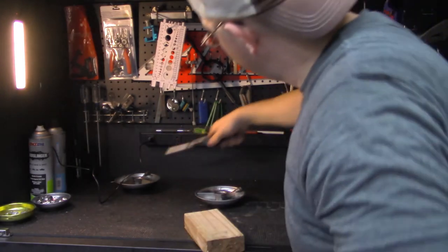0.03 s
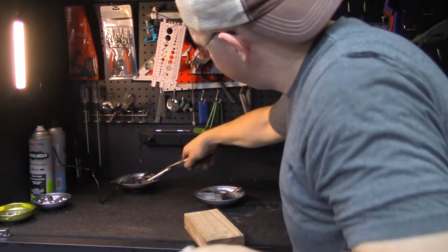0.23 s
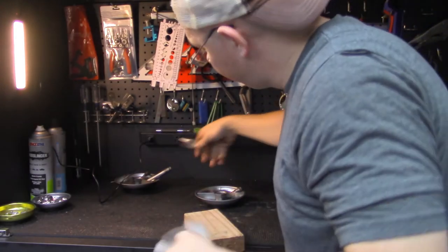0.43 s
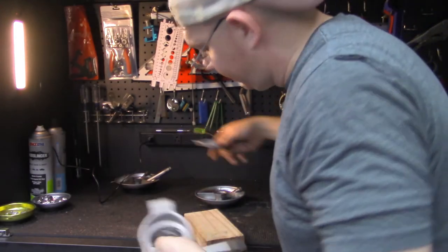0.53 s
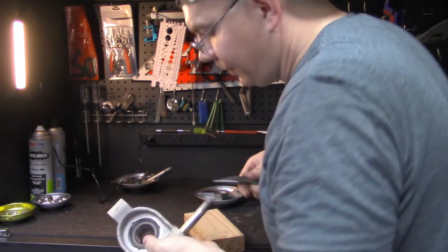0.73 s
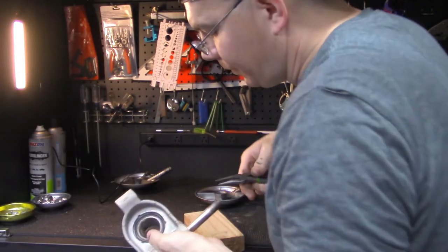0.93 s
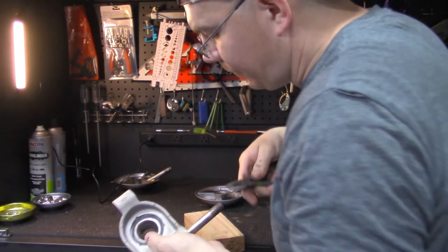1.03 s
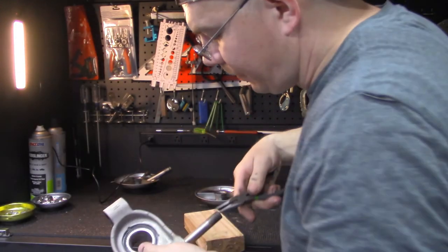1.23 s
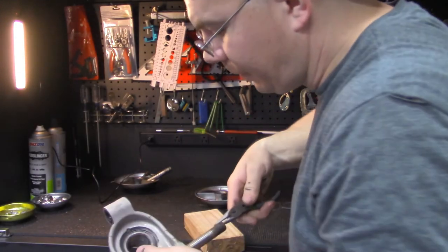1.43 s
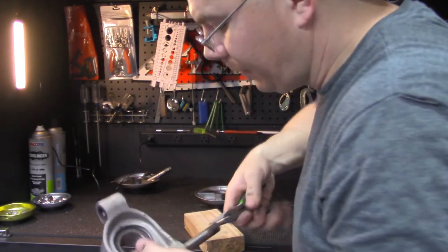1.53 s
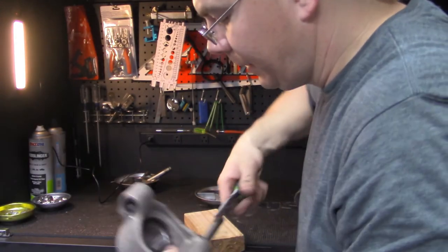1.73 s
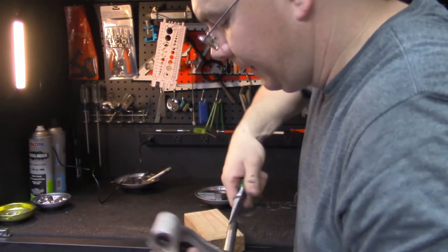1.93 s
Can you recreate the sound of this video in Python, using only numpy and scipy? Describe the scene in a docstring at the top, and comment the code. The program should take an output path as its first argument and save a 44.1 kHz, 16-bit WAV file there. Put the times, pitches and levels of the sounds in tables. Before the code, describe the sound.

A steel tool is dropped into a metal parts dish at about 0.23 seconds: a loud bright clank, rapid rattling and hollow bench knock until 0.35, ringing briefly. A sharp settling tick comes at 0.52, a soft low bump near 0.78. Pliers click and scrape on metal from 1.33 to 1.58, slip softly at 1.65, then faint hand rubbing. Small room, close microphone, quiet air and low rumble.

```python
"""A steel tool drops into a parts dish on a workbench: blows excite clear and crowded modes of tool and dish,
the dish rattles, drumming on the bench top, and the tool settles with a tick. A dull bump follows, then pliers
click and scrape on a metal part, the jaws slip softly, and the part rubs in the hand as it is turned over.
A small workshop reverberates the tool and part, over faint air noise and a low rumble, both shaped noise."""
import sys
import numpy as np
from scipy import signal
from scipy.fft import rfft, irfft
from scipy.io import wavfile
from scipy.ndimage import uniform_filter1d

SR = 44100
rng = np.random.default_rng(int(sys.argv[2]) if len(sys.argv) > 2 else 0)


def transcribe(u):
    """Save the signal u as a 16-bit wav file named by the first command-line argument.

    u: samples, shape (n,) or (channels, n), limited to [-1, 1]; the rate is SR.
    q: integer samples, one column per channel.
    """
    v = np.clip(np.atleast_2d(u).T, -1, 1)
    q = np.round(v * 32767).astype(np.int16)
    wavfile.write(sys.argv[1], SR, q)


N = 88200
T = np.arange(N) / SR  # time in seconds
HZ = np.maximum(np.fft.rfftfreq(N, 1 / SR), 1)  # frequency of each spectral bin, kept above zero for the logarithm
LEFT_RIGHT = np.array([[1], [-1]])  # opposite signs for the two channels

# Spectrum of the air noise. Each row: frequency in Hz, relative level in dB.
AIR_SPECTRUM = [(15, -37), (25, -2), (96, -10), (215, -22), (289, -21.5), (552, -23.5), (631, -20.5),
                (848, -26.5), (1020, -29), (1170, -28), (2630, -37), (4500, -36.5), (15500, -47)]
AIR_DB = -43
# Spectrum of the low rumble. Each row: frequency in Hz, relative level in dB per Hz.
RUMBLE_SPECTRUM = [(20, -14.5), (40, 1), (65, -4.5), (100, -9.5), (150, -21.5), (280, -36.5), (500, -44.5),
                   (2000, -73)]
# Course of the rumble. Each row: time in seconds, level in dB.
RUMBLE_LEVEL = [(0, -70), (.2, -42), (.3, -34), (.45, -45.5), (.72, -46.5), (.81, -31.5), (.92, -37),
                (1.05, -39), (1.3, -51.5), (2, -69.5)]

# Reverberation time of the workshop. Each row: frequency in Hz, decay by 60 dB in seconds.
ROOM_DECAY = [(200, 0.61), (1000, 0.3), (4000, 0.36), (7000, 0.32), (12000, 0.14)]
ROOM_BUILD_S = 0.0016
# How the microphone pair hears diffuse sound.
# Each row: frequency in Hz, left minus right in dB, phase lead of the left in rad, coherence from 0 to 1.
DIFFUSE_STEREO = [(40, 2.5, 1.1, 0.99), (122, 6, 0.65, 1), (318, 4, 1.4, 0.65), (900, 9.5, 1.67, 0.12),
                  (2500, 6, -1, 0.32), (6100, 2.5, -1.1, 0.36), (8800, 3, -1.5, 0.7),
                  (13700, 0.5, -3, 0.66)]
# How the microphone pair hears direct sound.
# Each row: frequency in Hz, left minus right in dB, phase lead of the left in rad.
DIRECT_STEREO = [(200, 5, .3), (900, 8, -.2), (2500, 5, -.4), (6000, 3, -.35), (8000, 2, -.7),
                 (9500, 1, -1.8), (13000, 0, -2.8)]
TOP_HZ = 16000  # upper limit of the recorder

# Rubs of the part in the hand.
# Each row: centre in seconds, half length in seconds, level in dB, resonance in Hz, its width in Hz.
RUBS = [(1.818,0.19,-58,1487,507), (1.954,0.091,-57.5,850,247)]
RUB_GRAIN_DB = 4

# A soft bump as the part is brought up to the bench.
BUMP_S, BUMP_DB, BUMP_T60_S, BUMP_HZ = 0.775, -43.5, 0.19, 290

# Light metal contacts; the grip and the spot touched set three short resonances. Each row: start in seconds,
# relative level in dB, extra level of the low resonance in dB, low, middle and high resonance in Hz.
TICKS = [(0.5208,3,-2.5,3150,4800,6680), (1.3274,-8.5,7,2530,5300,6950), (1.3367,-8.5,7,2750,5000,7000),
         (1.36,-2,-1,2430,4670,6950), (1.377,-13,16,2860,5360,6750), (1.3863,-4,4,2120,4500,5600),
         (1.4695,-0.5,-11,2330,4170,6040), (1.4947,-12.5,0,2280,4150,5700), (1.5807,-9.5,-8,2360,4220,6200)]
# Colour of a light contact. Each row: frequency in Hz, level in dB per Hz.
TICK_SPECTRUM = [(200, -36), (950, -10.5), (1450, -16.5), (2000, -6.5), (3200, -7), (4200, -6), (5800, -4),
                 (7200, -2.5), (8300, -13.5), (9500, -14.5), (11000, -17.5), (16000, -55)]
TICK_DB, TICK_PEAK_DB, TICK_PEAK_WIDTH_HZ = -3.5, 9, 530
TICK_GRIT_DB, TICK_GRIT_T60_S = -6, 0.0058
CONTACT_RING_DB, CONTACT_RING_T60_S, CONTACT_ROOM_DB = -1.5, 0.071, -4.5
# Colour of the jaws sliding over the part. Each row: frequency in Hz, level in dB.
SCRAPE_SPECTRUM = [(300, -13), (700, -4.5), (950, 8), (1400, -7.5), (2100, 0), (2800, 11), (3600, -5),
                   (7000, -7), (8500, -34), (15000, -34)]
SCRAPE_S, SCRAPE_LENGTH_S, SCRAPE_PER_S, SCRAPE_DB = 1.335, 0.062, 900, -25.5
# Colour of the jaws slipping off the part. Each row: frequency in Hz, relative level in dB.
SLIP_SPECTRUM = [(1000,-22), (4500,-3.5), (16000,-15)]
SLIP_S, SLIP_WIDTH_S, SLIP_DB = 1.65, 0.033, -50.5

# Blows of the tool on the dish. Each row: start in seconds, then relative levels in dB
# of the clash, the ring of the tool, the ring of the dish and the thud of the bench.
KNOCKS = [(0.2306,3,-1.5,-6,-7), (0.2334,-3.5,-6,-7,-6), (0.2461,-9,-16.5,-0.5,6.5), (.285,-8,-21,1.5,-2),
          (0.3275,-4,-1.5,-3,4.5), (0.334,-9.5,-7.5,-10.5,-4)]
STRIKE_SCATTER_DB = 3  # every blow lands on another spot and favours other modes
SETTLE_RING_DB = -23  # the settling tick stirs the tool's ring again
# Crowded high modes of the dish. Each row: frequency in Hz, relative level in dB per Hz.
CLASH_SPECTRUM = [(200, -31.5), (600, -22.5), (1150, -4), (1750, -17), (2220, 0), (2700, -12), (3900, -3),
                  (5200, -3.5), (6000, 3), (7400, -1.5), (8100, -7), (9400, -8.5), (10400, -9),
                  (11800, -27.5), (16000, -39)]
CLASH_DB, CLASH_T60_S, CLASH_ROOM_DB, CLASH_SIDE_DB = -9.5, 0.045, -4.5, -10.5
# The lighter contacts of the rattle have a flatter colour.
# Each row: frequency in Hz, relative level in dB per Hz.
RATTLE_SPECTRUM = [(300,-15), (1300,-1), (7400,-0.5), (10000,-8.5), (12000,-47)]
# The dish rocks on the bench between the blows; its contacts fade in dB per second.
RATTLE_S, RATTLE_LENGTH_S, RATTLE_PER_S, RATTLE_FADE_DB_S = 0.247, 0.08, 260, 28
RATTLE_STEEL_DB = -13.5
# Clear modes of the tool. Each row: frequency in Hz, level in dB, decay by 60 dB in seconds.
TOOL_MODES = [(2201.5,-18,0.083), (3856,-26.5,0.11), (4929,-31,0.72), (5013,-21.5,0.12), (6158,-22,0.079),
              (8795,-24.5,0.13)]
# Clear modes of the dish. Each row: frequency in Hz, level in dB, decay by 60 dB in seconds.
DISH_MODES = [(242,-38,0.43), (689,-43.5,0.52), (1327,-31.5,.22), (1622,-38,0.41), (3284,-28,0.21),
              (7490,-28,0.27)]
TWIN_SPLIT, TWIN_DB = 0.0072, -15  # mean share by which a mode's weaker twin lies higher, and its level
MODE_SPREAD_RAD, RING_ROOM_DB = 0.45, -10  # each mode radiates its own way, so the two ears differ
# Resonances of dish and bench top together. Each row: frequency in Hz, width in Hz, relative level in dB.
BENCH_MODES = [(175.7, 44, -5), (242.5, 21, -1.5), (327, 120, -6), (435, 31, -23.5), (613, 46, 4.5),
               (680, 90, 4), (860, 120, -2.5), (1160, 91, 0), (1332, 96, 6), (1524, 68, 1)]
BENCH_DB, BENCH_T60_S, BENCH_ROOM_DB, BENCH_PAN_DB = -32.5, 0.073, -1, 19  # pan: left minus right


def amp(db):
    """Decibel law: level to amplitude ratio."""
    return 10 ** (np.asarray(db) / 20)


def over_hz(table, axis=1):
    """Logarithmic frequency scale: one column of a table, interpolated along it."""
    table = np.array(table, float)
    return np.interp(np.log(HZ), np.log(table[:, 0]), table[:, axis])


def fade(t60):
    """Exponential decay: damping lowers the amplitude by 60 dB in t60 seconds."""
    return np.exp(-np.log(1000) * T / max(t60, 1e-3))


def resonance(hz, width):
    """Resonance: the gain peaks at 1 and falls off on either side."""
    return 1 / (1 + (2 * (HZ - hz) / width) ** 2)


def noise(gain):
    """Spectral shaping: random noise of rms 1 coloured by a gain."""
    x = irfft(rfft(rng.standard_normal(N)) * gain, N)
    return x / x.std()


def unit(x):
    """Energy normalisation: a response scaled to unit energy, averaged over its channels."""
    return x / np.sqrt(np.mean(np.sum(x ** 2, axis=-1)))


def excite(push, response):
    """Superposition: convolution lets every push start the response anew."""
    return signal.fftconvolve(np.atleast_2d(push), np.atleast_2d(response), axes=-1)[:, :N]


def pushes(times, dbs):
    """Impulsive excitation: one impulse for each contact."""
    return np.bincount((np.asarray(times) * SR).astype(int), amp(dbs), N)[:N]


def chatter(start, length, rate, fade_db, scatter_db):
    """Repeated impact: uneven contacts that weaken by fade_db per second."""
    chance = rng.standard_normal((200, 2))
    after = np.abs(np.arange(len(chance)) + 0.35 * chance[:, 0]) / rate
    levels = scatter_db * chance[:, 1] - fade_db * after
    keep = after < length
    return pushes(start + after[keep], levels[keep])


def click(gain):
    """Minimum phase: the most compact causal pulse with the given spectrum, by folding the cepstrum."""
    cepstrum = irfft(np.log(gain), N)
    cepstrum[1:N // 2] *= 2
    cepstrum[N // 2 + 1:] = 0
    return irfft(np.exp(rfft(cepstrum)), N)


def envelope(push, t60):
    """Energy addition: the height of a ring that every push feeds afresh."""
    return np.sqrt(np.abs(excite(push ** 2, fade(t60) ** 2)))


def crowded(push, t60, gain):
    """High modal density: modes too close to tell apart act as fading noise, coloured by the struck body."""
    return excite(envelope(push, t60) * noise(1), unit(click(gain)))


def diffuse(gain):
    """Diffuse field: partly coherent stereo noise of rms 1, as if from all sides."""
    left, other = rfft(rng.standard_normal((2, N)))
    balance = amp(over_hz(DIFFUSE_STEREO) / 2)
    coherence = np.clip(over_hz(DIFFUSE_STEREO, axis=3), 0, 1)
    right = coherence * left + np.sqrt(1 - coherence ** 2) * other
    right = right * np.exp(-1j * over_hz(DIFFUSE_STEREO, axis=2))
    x = irfft(np.array([left * balance, right / balance]) * gain, N)
    return x / x.std()


def place(x):
    """Direct field: level and phase differences between the microphones, mostly louder on the left."""
    balance = amp(over_hz(DIRECT_STEREO) / 2)
    lag = np.exp(-1j * over_hz(DIRECT_STEREO, axis=2))
    return irfft(rfft(x) * np.array([balance, lag / balance]), N)


def background():
    """Stationary and swelling noise: faint air, and a low rumble that swells as things are moved about."""
    air = amp(AIR_DB) * diffuse(amp(over_hz(AIR_SPECTRUM)))
    rumble_gain = amp(np.interp(T, *np.array(RUMBLE_LEVEL).T))
    return air + rumble_gain * diffuse(amp(over_hz(RUMBLE_SPECTRUM)))


def workshop():
    """Reverberation: dense reflections build up quickly and decay at a rate that depends on frequency."""
    field = rfft(diffuse(1))
    centres = [hz for hz, _ in ROOM_DECAY]
    tail = 0
    for hz, t60 in ROOM_DECAY:
        band = over_hz([(c, c == hz) for c in centres])  # a triangle that overlaps its neighbours
        tail = tail + irfft(field * band, N) * fade(t60)
    return unit(tail * (1 - np.exp(-(T / ROOM_BUILD_S) ** 2)))


def bump():
    """Soft impact: a padded contact excites nothing above the low mids."""
    dull = 1 / (1 + (HZ / BUMP_HZ) ** 8)
    return amp(BUMP_DB) * place(crowded(pushes([BUMP_S], [0]), BUMP_T60_S, dull))


def handling(room):
    """Sliding friction: soft, grainy resonant rubs swell and die away as the part is turned over."""
    rubs = 0
    for s, half, db, hz, width in RUBS:
        grain = amp(RUB_GRAIN_DB * noise(resonance(0, 120)))  # slow random flutter of the level
        swell = np.exp(-((T - s) / half) ** 2)
        rubs = rubs + amp(db) * swell * grain / grain.mean() * noise(resonance(hz, width))
    return place(rubs) + amp(CONTACT_ROOM_DB) * excite(rubs, room)


def tick(s, db, low_db, *pitches):
    """Hard contact: a sharp pulse through three short resonances, with a random crunch of surface grit."""
    peaks = 0
    for hz, extra in zip(pitches, (low_db, 0, 0)):
        peaks = peaks + amp(TICK_PEAK_DB + extra) * resonance(hz, TICK_PEAK_WIDTH_HZ)
    colour = amp(over_hz(TICK_SPECTRUM)) * (1 + peaks)
    pulse = excite(pushes([s], [db + TICK_DB]), click(colour))
    grit = unit(noise(1) * fade(TICK_GRIT_T60_S))
    return pulse + amp(TICK_GRIT_DB) * excite(pulse, grit)


def scrape():
    """Sliding contact: the jaws give a dense run of small, uneven pulses."""
    grit = chatter(SCRAPE_S, SCRAPE_LENGTH_S, SCRAPE_PER_S, fade_db=7, scatter_db=5)
    return amp(SCRAPE_DB) * excite(grit, click(amp(over_hz(SCRAPE_SPECTRUM))))


def slip():
    """Friction noise: the jaws leave the part in one soft swell."""
    swell = np.exp(-((T - SLIP_S) / SLIP_WIDTH_S) ** 2)
    return amp(SLIP_DB) * swell * noise(amp(over_hz(SLIP_SPECTRUM)))


def light_contacts(room):
    """Damped vibration: ticks, scrape and slip share a brief noisy ring."""
    direct = scrape() + slip() + sum(tick(*row) for row in TICKS)
    ring = amp(CONTACT_RING_DB) * excite(direct, unit(noise(1) * fade(CONTACT_RING_T60_S)))
    return place(direct + ring) + amp(CONTACT_ROOM_DB) * excite(direct, room)


def steel(modes, times, dbs):
    """Modal vibration: every blow feeds the clear modes unevenly, and each beats faintly with its twin."""
    ring = 0
    for hz, db, t60 in modes:
        phase, twin_phase, split = rng.random(3)  # phases in cycles
        ears = MODE_SPREAD_RAD * rng.standard_normal() * LEFT_RIGHT
        push = pushes(times, dbs + STRIKE_SCATTER_DB * rng.standard_normal(len(times)))
        twin_hz = hz * (1 + TWIN_SPLIT * (0.5 + split))
        main = np.sin(2 * np.pi * (hz * T + phase) + ears)
        twin = np.sin(2 * np.pi * (twin_hz * T + twin_phase) - ears)
        height = uniform_filter1d(envelope(push, t60), size=16)  # softens the onset
        ring = ring + amp(db) * height * (main + amp(TWIN_DB) * twin)
    return ring


def clashing(blows, rattle):
    """Impact on a thin shell: blows and lighter rattle excite the crowded high modes."""
    hard = crowded(blows, CLASH_T60_S, amp(over_hz(CLASH_SPECTRUM)))
    light = crowded(rattle, CLASH_T60_S, amp(over_hz(RATTLE_SPECTRUM)))
    return hard + amp(RATTLE_STEEL_DB) * light


def dropped_tool(room):
    """Coupled vibration: blows and rattle make tool and dish clash and ring, and drum on the bench."""
    times, clash_db, tool_db, dish_db, bench_db = np.array(KNOCKS).T
    rattle = chatter(RATTLE_S, RATTLE_LENGTH_S, RATTLE_PER_S, fade_db=RATTLE_FADE_DB_S, scatter_db=4.0)
    blows = pushes(times, clash_db)
    mid, side = clashing(blows, rattle), clashing(blows, rattle)
    clash = amp(CLASH_DB) * (mid + amp(CLASH_SIDE_DB) * side * LEFT_RIGHT)

    tool_times = np.append(times, TICKS[0][0])  # the first tick is the tool settling
    tool_ring = steel(TOOL_MODES, tool_times, np.append(tool_db, SETTLE_RING_DB))
    ring = tool_ring + steel(DISH_MODES, times, dish_db)

    body = sum(amp(db) * resonance(hz, width) for hz, width, db in BENCH_MODES)
    bench = amp(BENCH_DB) * crowded(rattle + pushes(times, bench_db), BENCH_T60_S, body)

    sent = amp(CLASH_ROOM_DB) * clash + amp(RING_ROOM_DB) * ring + amp(BENCH_ROOM_DB) * bench
    return place(clash + ring) + bench * amp(LEFT_RIGHT * BENCH_PAN_DB / 2) + excite(sent, room)


def scene():
    """Superposition: background and all bench sounds add, with one room response shared."""
    room = workshop()
    return dropped_tool(room) + light_contacts(room) + background() + bump() + handling(room)


def record(dry):
    """Limited range and bandwidth: the recorder clips at full scale, then cuts the top."""
    low_pass = signal.ellip(8, 0.2, 70, TOP_HZ, fs=SR, output="sos")
    return signal.sosfilt(low_pass, np.clip(dry, -1, 1))


dry = scene()
out = record(dry)
transcribe(out)
```